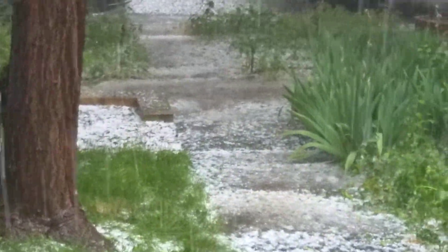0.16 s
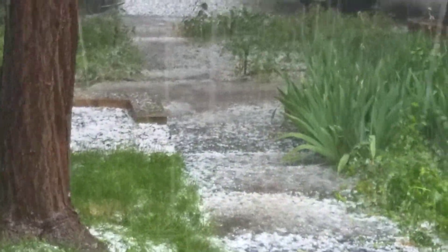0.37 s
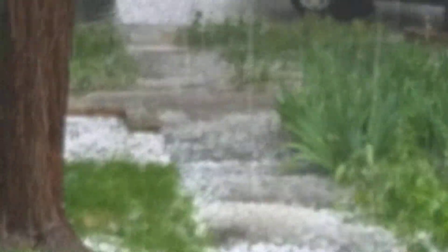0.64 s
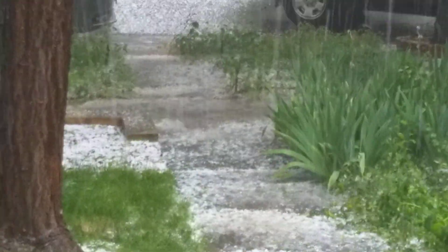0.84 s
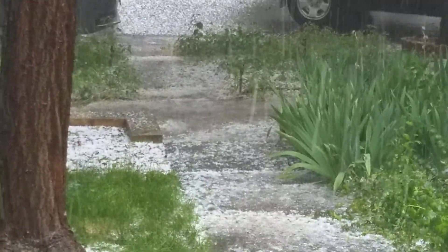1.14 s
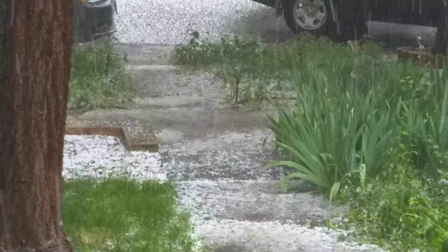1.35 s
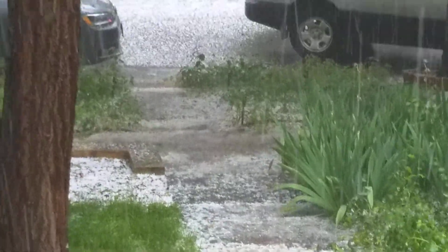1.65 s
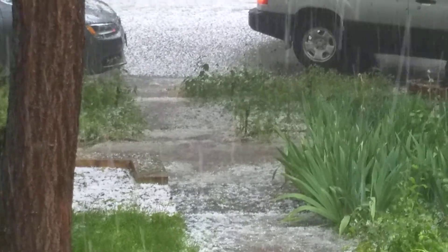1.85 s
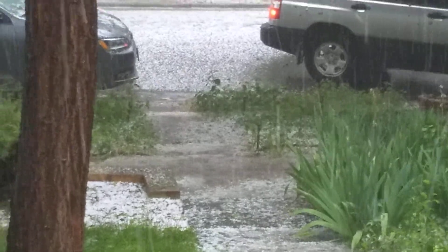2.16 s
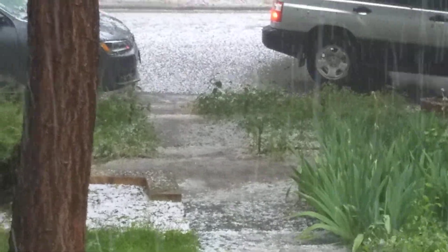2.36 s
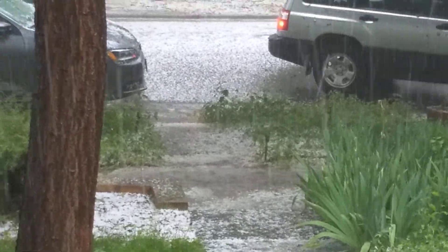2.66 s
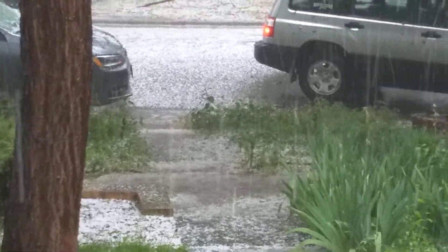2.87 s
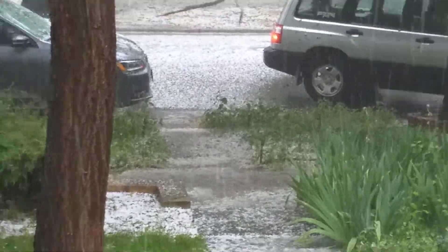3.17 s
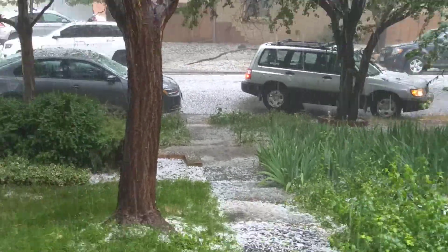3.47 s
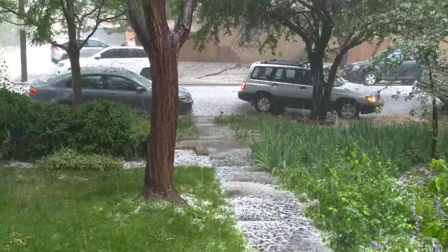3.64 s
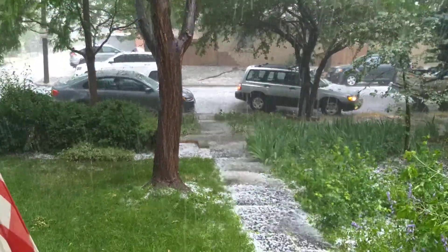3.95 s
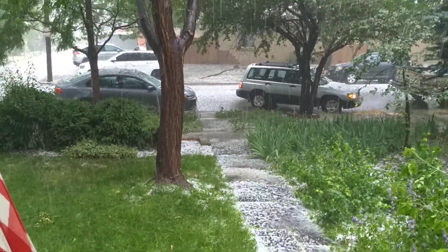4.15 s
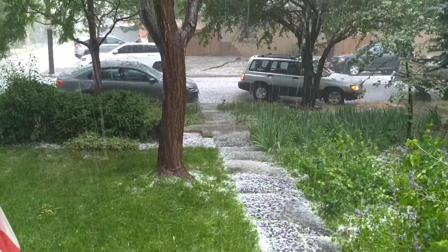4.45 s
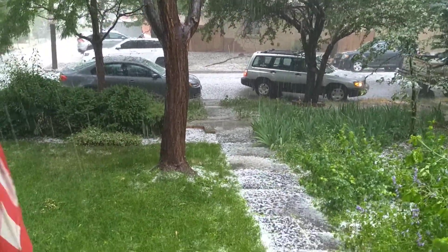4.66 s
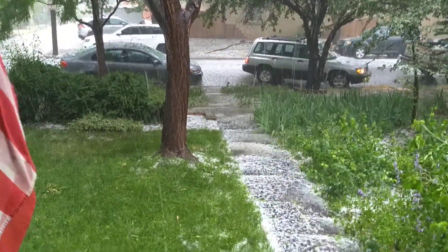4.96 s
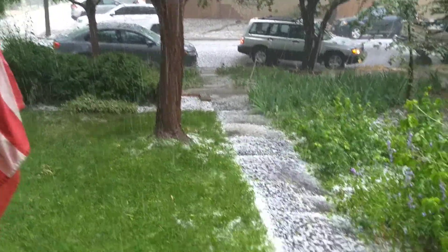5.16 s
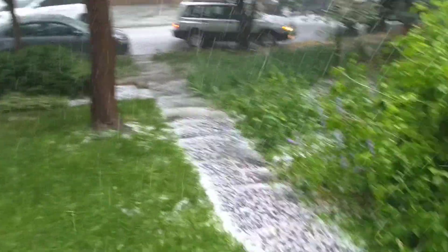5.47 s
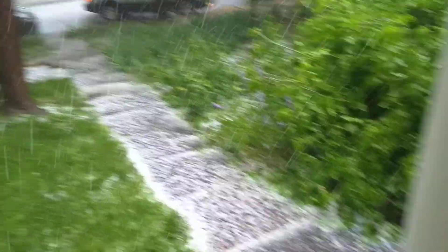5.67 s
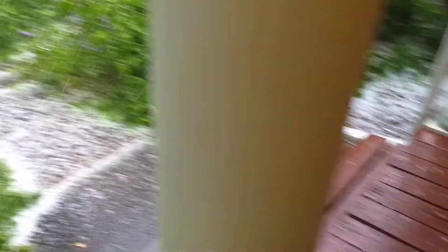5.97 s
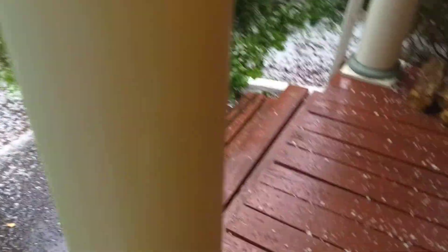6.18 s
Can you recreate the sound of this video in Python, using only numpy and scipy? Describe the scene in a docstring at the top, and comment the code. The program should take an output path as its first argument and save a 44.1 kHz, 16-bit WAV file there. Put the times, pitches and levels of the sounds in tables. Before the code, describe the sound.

A steady hail downpour heard from a porch: crisp wash off concrete, pattering leaves, dull thuds overhead and sharp nearby stone clicks.

```python
"""Hail and heavy rain from a porch

Small hail and heavy rain pelt a lawn, shrubs and a concrete walk; close stones tick out of the wash.
Coloured noise stands for the distant impacts, short damped rings for the nearer ones.
The roof drums, heavy at first and then easing, and soft low booms rise from one of its panels.
A hand-held stereo recorder widens the picture by cross-feeding its ports; the level sags briefly at times."""
import sys
import numpy as np
from scipy import signal
from scipy.fft import rfft, irfft, next_fast_len
from scipy.io import wavfile
from scipy.ndimage import uniform_filter1d, map_coordinates

SR = 44100
rng = np.random.default_rng(int(sys.argv[2]) if len(sys.argv) > 2 else 0)


def inscribe(sig):
    """Save sig as 16-bit PCM at rate SR to the path in sys.argv[1].

    A 1-D sig is mono; a 2-D sig holds one channel per row.
    Samples are clipped to [-1, 1] before scaling.
    """
    pcm = np.round(np.clip(np.atleast_2d(sig).T, -1, 1) * 32767)
    wavfile.write(sys.argv[1], SR, pcm.astype(np.int16))


N = 278446
TOP_HZ = 15500  # upper limit of the recorded band


def amp(db):
    """Decibels to gain."""
    return 10 ** (np.asarray(db) / 20)


def unit(x):
    """Scale to rms 1."""
    return x / np.sqrt(np.mean(x ** 2) + 1e-20)


def along(points, hz):
    """(f/Hz, value) points joined by straight lines on a log frequency axis."""
    f, v = np.transpose(points)
    return np.interp(np.log(hz + 1), np.log(f + 1), v)


def wobble(rate):
    """A smooth random curve, rate knots a second."""
    knots = rng.standard_normal(int(N * rate / SR) + 4)
    return map_coordinates(knots, [np.arange(N) * rate / SR])


def filtered(x, response):
    """x times a complex response of frequency."""
    m = next_fast_len(N + SR // 2)
    return irfft(rfft(x, m) * response(np.fft.rfftfreq(m, 1 / SR)), m)[..., :N]


def mid_side(pair):
    """Half the sum and half the difference of the two channels."""
    left, right = pair
    return np.array([left + right, left - right]) / 2


def left_right(mid, side):
    """Mid and side back to the two channels."""
    return np.array([mid + side, mid - side])


def wash(patchy_db):
    """Distant impacts merged into stereo noise, with drifting patches of colour."""
    z = signal.stft(rng.standard_normal((2, N)), nperseg=512)[2]
    field = rng.standard_normal(z.shape[1:])
    field = uniform_filter1d(field, size=7, axis=0)  # smooth over frequency
    field = uniform_filter1d(field, size=12, axis=1)  # smooth over time
    patches = amp(patchy_db * unit(field))
    return unit(signal.istft(z * patches, nperseg=512)[1][:, :N])


def impacts(per_second, ring_hz, spread, cycles, scatter_db, size):
    """Impacts of size samples: each a damped ring with its own pitch, strength and direction."""
    count = int(per_second * N / SR)
    when, bearing = rng.random((2, count, 1))
    hz = np.clip(ring_hz * np.exp(spread * rng.standard_normal((count, 1))), 50, TOP_HZ)
    strength = amp(scatter_db * np.minimum(rng.exponential(size=(count, 1)), 5))
    phase = hz * np.arange(size) / SR  # in cycles
    decay = np.exp(-phase / cycles)
    # the root of the pitch offsets the shorter life of high rings
    rings = strength * np.sqrt(hz) * np.sin(2 * np.pi * phase) * decay
    ports = []
    for side in (bearing - .5, .5 - bearing):
        # the nearer port hears an impact earlier and louder
        start = np.abs(when * N - side * SR * .0006).astype(int)
        places = start + np.arange(size)
        ports.append(np.bincount(places.ravel(), (rings * (1 + side)).ravel(), N)[:N])
    return unit(np.array(ports))


def surface(spectrum, far, near, near_db):
    """Far wash and near impacts take the colour of the surface they fall on."""
    return unit(filtered(far + amp(near_db) * near, lambda hz: amp(along(spectrum, hz))))


def surges():
    """Each surge moves the roof, lawn and pavement levels along a bell in time; returns the three in dB."""
    # brief surges of the downpour: t/s, length/s, roof level/dB, lawn level/dB, pavement level/dB
    surge_rows = [(.12, 0.15, 0.5, 0.5, 0.3), (0.918, 0.04, -1, 0.5, 1), (1.08, 0.09, -2, 0.5, 0.6),
                  (1.45, .3, 0.5, 0.4, -0.4), (1.76, 0.21, 2, -0.5, -0.5), (2.4, 0.36, -0.5, 0, -0.2),
                  (3.685, 0.055, 1.5, 0, 0), (5.01, 0.13, 3, 1.7, 1.2), (5.703, .04, 2.5, 1, 1.8),
                  (6.265, 0.093, 1.5, 2.5, 2)]
    t = np.arange(N) / SR
    total_db = 0
    for s, length, *rises_db in surge_rows:
        bell = np.exp(-((t - s) / length) ** 2)
        total_db = total_db + np.outer(rises_db, bell)
    return total_db


def roof_drumming(surge_db):
    """Low, dull thuds overhead and their merged wash, coloured by the roof."""
    # colour of the roof: f/Hz, level/dB
    roof_colour = [(20, -46), (35, -26), (55, -11), (85, -1.5), (135, -3), (195, -0.4), (290, -3),
                   (400, -4.5), (520, -10), (660, -3.5), (850, -12), (1200, -56)]
    steady_db, heavy_db, ease_s = -31, 4, 2.2  # starts heavy and eases to a steady level
    t = np.arange(N) / SR
    level_db = steady_db + heavy_db * np.clip(1 - t / ease_s, 0, 1) + surge_db
    thuds = impacts(per_second=120, ring_hz=187.5, spread=0.436, cycles=3.3, scatter_db=2.0, size=3000)
    return amp(level_db) * surface(roof_colour, wash(patchy_db=0.5), thuds, near_db=-33.5)


def lawn_patter(swing, change_db):
    """Taps on leaves and lawn; the porch boards add patter and reflect it with a higher, hollower colour."""
    # colour of the patter, facing the garden: f/Hz, level/dB
    garden_colour = [(150, -40), (330, -12), (480, -4), (610, -1.2), (740, -1.4), (900, -1.8), (1300, -4),
                     (1600, -1.9), (1950, -3.9), (2500, -13), (5000, -50)]
    # colour of the patter, facing the porch: f/Hz, level/dB
    porch_colour = [(150, -40), (300, -5), (500, -4.5), (640, -1.8), (720, -2), (830, 1), (1050, -1),
                    (1170, -3.5), (1450, .1), (1950, -3.2), (2500, -13), (5000, -50)]
    level_db = -25.5 + 1 * swing + change_db  # 1 dB more when fully turned to the porch
    taps = impacts(per_second=400, ring_hz=942, spread=0.483, cycles=3.7, scatter_db=2, size=800)
    patter = wash(patchy_db=1.04)
    garden = surface(garden_colour, patter, taps, near_db=-20.5)
    porch = surface(porch_colour, patter, taps, near_db=-20.5)
    return amp(level_db) * ((1 - swing) * garden + swing * porch)


def pavement_hiss(swing, change_db):
    """Sharp ticks and clicks in a bright hiss off the concrete, which the porch post shades."""
    # colour of the concrete walk: f/Hz, level/dB
    pavement_colour = [(900, -40), (1600, -12), (2150, -2.4), (3100, 1), (4200, -2.4), (5300, -3),
                       (6500, -3.9), (9000, -6.7), (12000, -9.8), (15400, -12.5)]
    level_db = -21 - 1.9 * swing + change_db  # 1.9 dB less when fully turned to the porch
    ticks = impacts(per_second=1300, ring_hz=8700, spread=0.3, cycles=0.74, scatter_db=2.5, size=100)
    # ice on concrete
    clicks = impacts(per_second=260, ring_hz=4370, spread=0.22, cycles=2.4, scatter_db=2.0, size=200)
    near = ticks + amp(-6.5) * clicks
    splashes = amp(0.32 * wobble(220))  # drops burst in clumps of spray
    return amp(level_db) * splashes * surface(pavement_colour, wash(patchy_db=1.02), near, near_db=-11.5)


def downpour():
    """Roof, lawn and pavement together, as the recorder swings between garden and porch."""
    # how far the recorder has swung from the garden towards the porch post: t/s, share (0-1)
    swing_points = [(0, 0.29), (3.9, 0), (4.6, 0.63), (5.6, 0.95), (5.9, 0.73), (6.3, 1)]
    t = np.arange(N) / SR
    swing = np.clip(np.interp(t, *np.transpose(swing_points)), 0, 1)
    roof_surge_db, lawn_surge_db, pavement_surge_db = surges()
    flurry_db = 0.28 * wobble(20)  # the stones arrive in uneven flurries
    roof = roof_drumming(roof_surge_db)
    lawn = lawn_patter(swing, lawn_surge_db + flurry_db)
    pavement = pavement_hiss(swing, pavement_surge_db + flurry_db)
    return roof + lawn + pavement


def hailstones():
    """A close stone gives a crack of ice and a few cycles of ring: dull knocks outlast bright ticks."""
    # stones landing close by: t/s, level/dB (relative), ring f/Hz, left over right level/dB
    stone_rows = [(0.051, -15, 662, -0.5), (0.574, -13, 3230, -5), (0.710, -10, 3060, -1),
                  (0.904, -1, 10500, -2), (0.968, -11.5, 590, -0.5), (1.078, -1, 3480, -0.5),
                  (1.131, -8, 3300, -1), (1.168, -7, 3310, 0.0), (1.357, -8, 714, -0.5),
                  (1.426, -1, 3610, -0.5), (1.466, -12, 640, -0.5), (1.522, -6, 3550, -1),
                  (1.837, -15, 556, 1), (2.267, -7, 3580, -1.0), (2.425, -9, 5600, -1.0),
                  (2.544, -8, 3460, -1), (2.565, -11, 950, -1.0), (3.153, -9, 5900, -1),
                  (3.376, -7, 6000, -1), (3.711, -9, 3430, -1), (4.200, -5, 5700, -1),
                  (4.475, -9, 5800, -1), (4.710, -10, 720, -1), (5.137, -8.5, 773, -1),
                  (5.146, -5, 3180, -3), (5.148, -4, 5900, -1), (5.571, -12, 760, -1),
                  (5.719, 0.5, 3600, -2), (6.025, -12, 1040, -1), (6.057, -11, 802, -1),
                  (6.218, -4.5, 860, -0.5)]
    out, t = np.zeros((2, N + SR)), np.arange(SR // 20) / SR
    ring_cycles, crack_s = 11, 0.0068  # each the time to fall by 60 dB
    for s, db, hz, pan_db in stone_rows:
        ring = np.sin(2 * np.pi * hz * t) * amp(-60 * hz * t / ring_cycles)
        crack = 0.24 * rng.standard_normal((2, len(t))) * amp(-60 * t / crack_s)
        pan = amp([[pan_db / 2], [-pan_db / 2]])
        out[:, round(s * SR):][:, :len(t)] += amp(db) * pan * (ring + crack) / 2
    return out[:, :N]


def booms():
    """A heavy stone gives a soft, low boom that swells and dies in the roof panel."""
    # stones on the roof panel: t/s, level/dB (before the swell and decay), ring f/Hz
    boom_rows = [(0.062, -21, 199), (0.165, -19, 198), (1.562, -25, 200), (1.685, -21.5, 222),
                 (1.79, -25, 136), (1.822, -24, 232), (3.10, -25, 201), (4.95, -28, 175)]
    attack_s, t60_s = 0.01, 0.19
    out, t = np.zeros(N + SR), np.arange(SR // 3) / SR
    for s, db, hz in boom_rows:
        envelope = (1 - np.exp(-t / attack_s)) * amp(db - 60 * t / t60_s)
        out[round(s * SR):][:len(t)] += envelope * np.sin(2 * np.pi * hz * t)
    return out[:N]


def scene():
    """The storm as it arrives at the two ports."""
    return downpour() + hailstones() + booms()


def widening(hz):
    """Mid and side response: each channel subtracts a delayed share of the other, which combs the two."""
    # likeness of the two ports before cross-feeding: f/Hz, likeness (-1 to 1)
    likeness = [(50, .5), (200, 0.75), (400, 0.4), (700, 0.7), (1100, 0), (1500, -0.52), (2000, 0.08),
                (2330, 0), (2650, 0.5), (3300, -0.35), (4000, -0.03), (4700, 0.36), (6000, 0)]
    # share fed to the other side: f/Hz, share (0-1)
    cross_share = [(200, 0.11), (400, 0.13), (700, 0.56), (1130, 0.72), (2300, 0.75), (3500, 0.78),
                   (4700, 0.76), (5900, 0.76), (6900, 0.53), (8200, 0.35), (9500, 0.3), (11900, 0.47),
                   (13100, 0.36), (15000, 0.42)]
    # lag of that share: f/Hz, lag/s
    cross_lag = [(2300, .000429), (3500, .000432), (4700, .000426), (5900, .000425), (6900, .000434),
                 (9500, .000422), (14300, .000419)]
    delay = along(cross_lag, hz)
    cross = np.clip(along(cross_share, hz), 0, .97) * np.exp(-2j * np.pi * hz * delay)
    alike = np.clip(along(likeness, hz), -.95, .95)
    pair = np.array([np.sqrt(1 + alike) * (1 - cross), np.sqrt(1 - alike) * (1 + cross)])
    # even out the mean power, so only the balance of mid and side changes
    return pair / np.sqrt(np.mean(np.abs(pair) ** 2, axis=0))


def unequal_ports(pair):
    """The two ports differ slightly in level from one frequency to the next."""
    # imbalance of the ports: f/Hz, left over right level/dB
    port_tilt = [(60, -0.5), (180, 1.7), (600, 0), (1600, -0.5), (3000, -1), (5500, 0.2), (7000, -3),
                 (14000, -1.5)]
    return filtered(pair, lambda hz: amp(np.outer([.5, -.5], along(port_tilt, hz))))


def wavering(x):
    """Hollows in the middle of the picture waver in pitch and depth: a faint watery swirl."""
    # deep hollows: centre f/Hz, half width f/Hz, mean level/dB
    hollow_rows = [(2335, 170, -44), (4740, 115, -30)]
    knots_per_s, swing_hz, swing_share = 24, 55, .6
    hz, t, z = signal.stft(x, SR, nperseg=1024, noverlap=768)

    def drift():
        return np.interp(t, np.arange(N) / SR, wobble(knots_per_s))

    gain_db = 0
    for centre_hz, width_hz, depth_db in hollow_rows:
        offset = (hz[:, None] - centre_hz - swing_hz * drift()) / width_hz
        shape = np.exp(-offset ** 4)  # flat floor, steep walls
        gain_db = gain_db + depth_db * shape * np.maximum(1 + swing_share * drift(), 0)
    return signal.istft(z * amp(gain_db), SR, nperseg=1024, noverlap=768)[1][:N]


def sags():
    """The level drops within milliseconds, holds, then creeps back."""
    # brief sags: t/s, level/dB, time until recovery starts/s
    sag_rows = [(0.193, -1.5, 0.035), (0.75, -2.5, 0.031), (1.846, -1.5, 0.13), (3.404, -1.5, 0.1),
                (3.723, -1.6, 0.16), (5.046, -1, 0.038), (5.723, -2.5, 0.15)]
    drop_s, recovery_s = 0.0089, 0.15
    t = np.arange(N) / SR
    total_db = 0
    for s, db, hold in sag_rows:
        drop = np.clip((t - s) / drop_s, 0, 1)
        recovery = np.clip(1 - (t - s - hold) / recovery_s, 0, 1)
        total_db = total_db + db * drop * recovery
    return amp(total_db)


def record(dry):
    """Stereo widening, slightly unequal ports, wavering hollows, level sags and the band limit."""
    mid, side = filtered(mid_side(dry), widening)
    wide = unequal_ports(left_right(mid, side))
    mid, side = mid_side(wide)
    swirled = left_right(wavering(mid), side)
    return filtered(swirled * sags(), lambda hz: hz < TOP_HZ)


dry = scene()
out = record(dry)
inscribe(out)
```